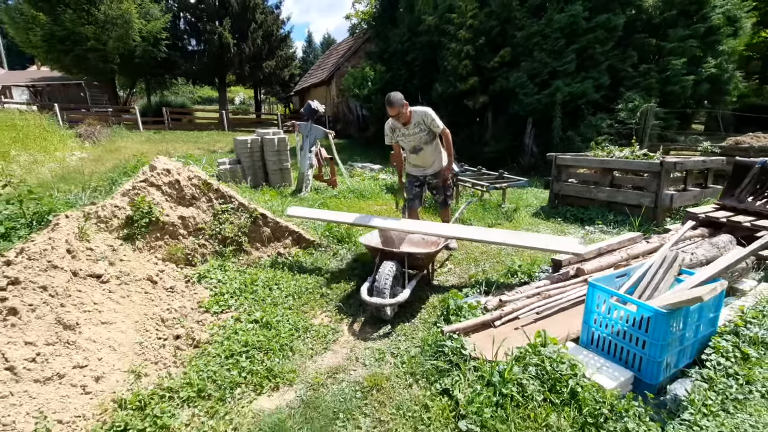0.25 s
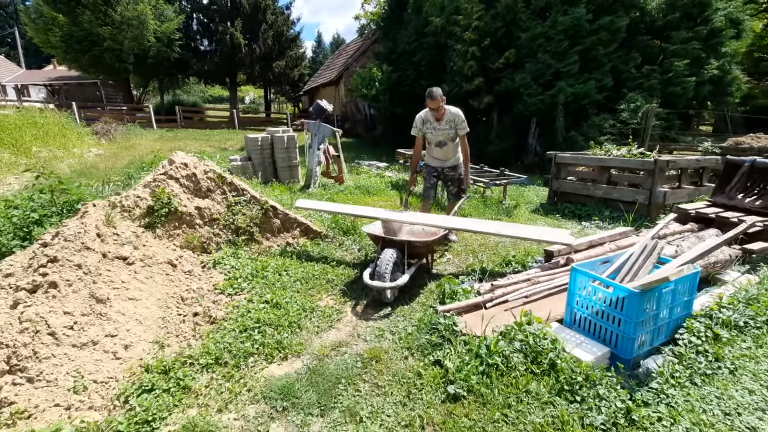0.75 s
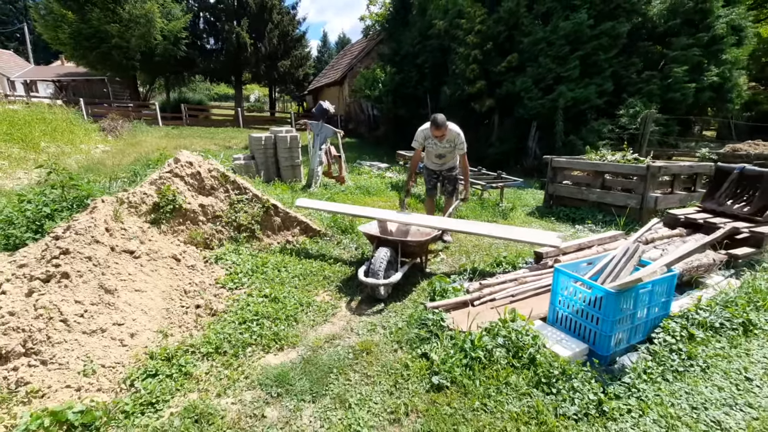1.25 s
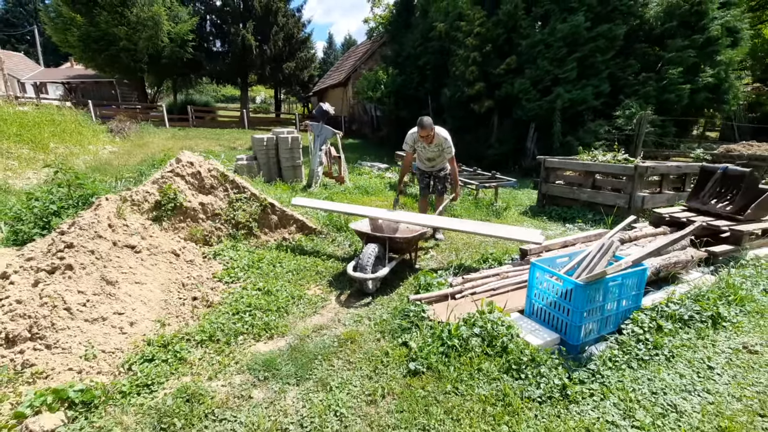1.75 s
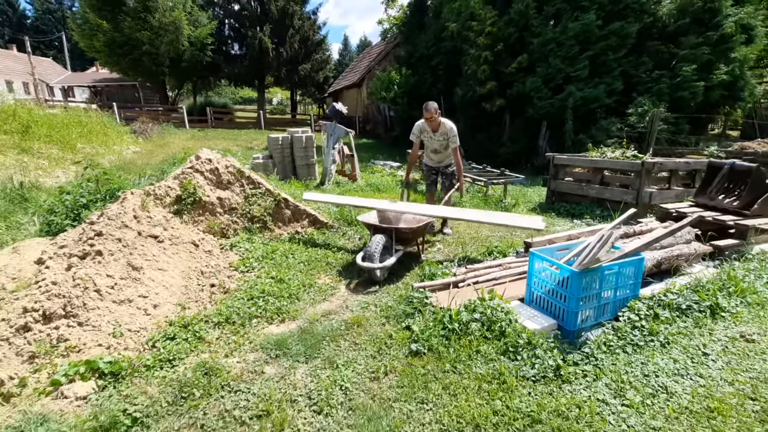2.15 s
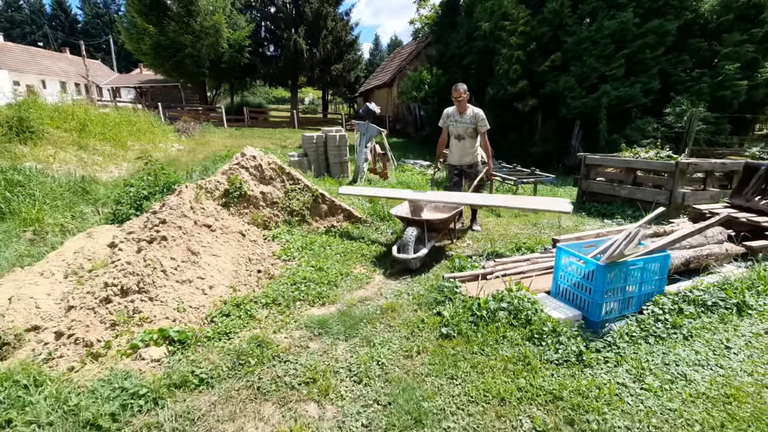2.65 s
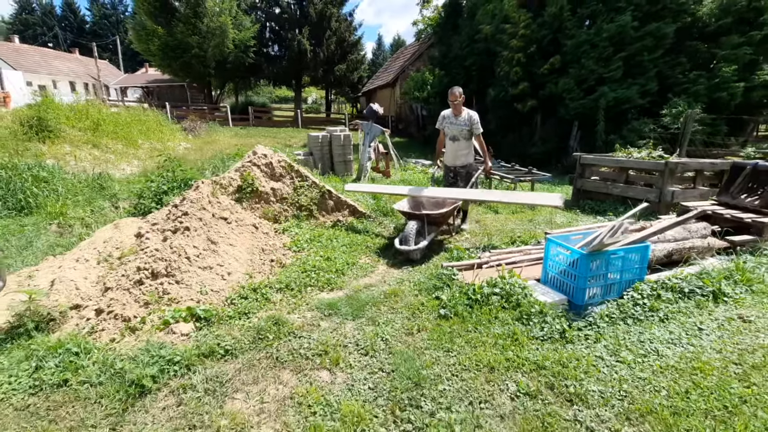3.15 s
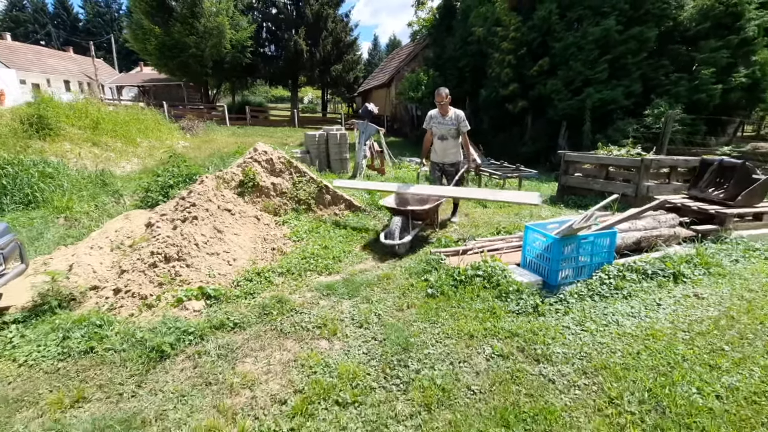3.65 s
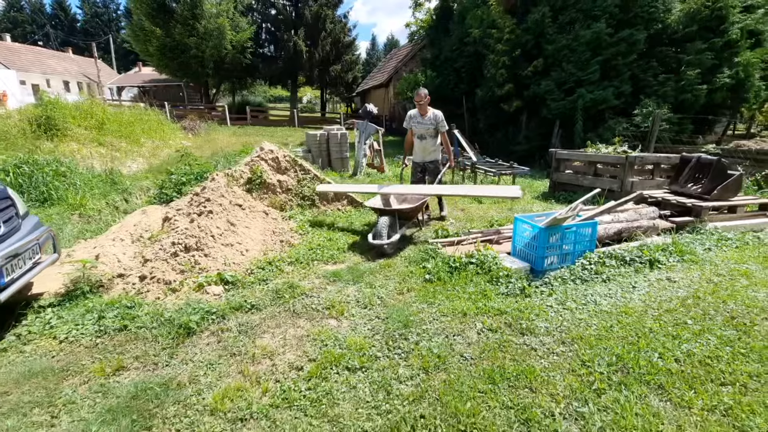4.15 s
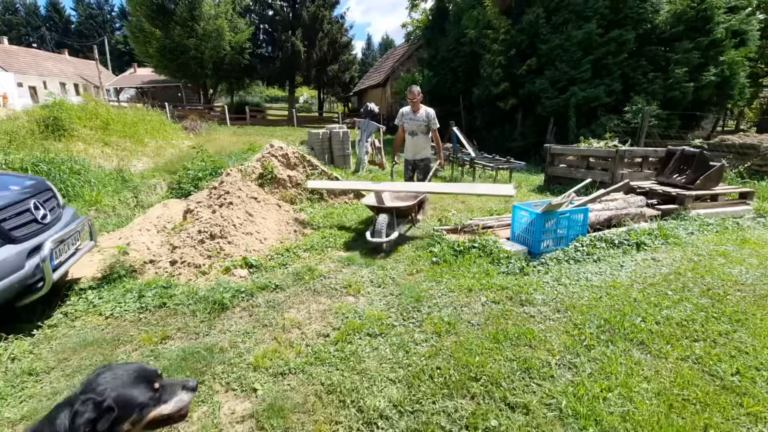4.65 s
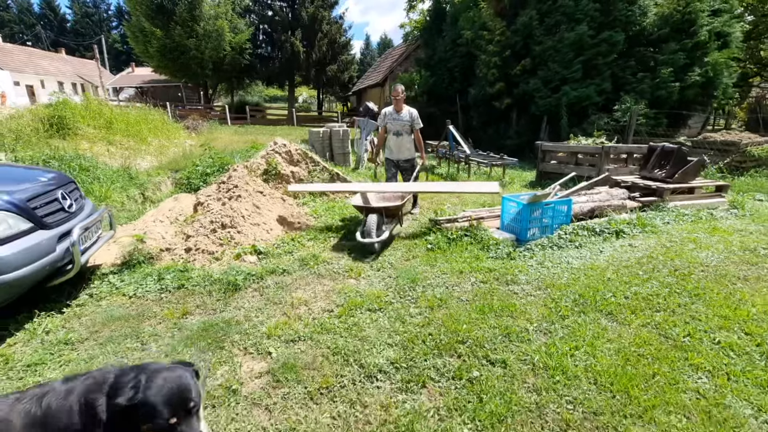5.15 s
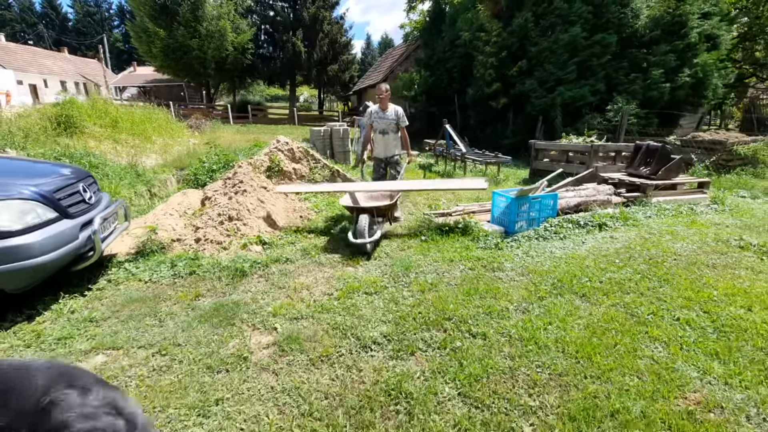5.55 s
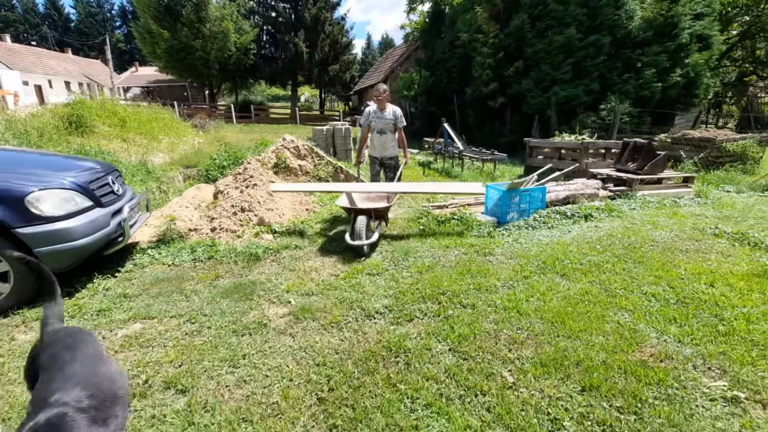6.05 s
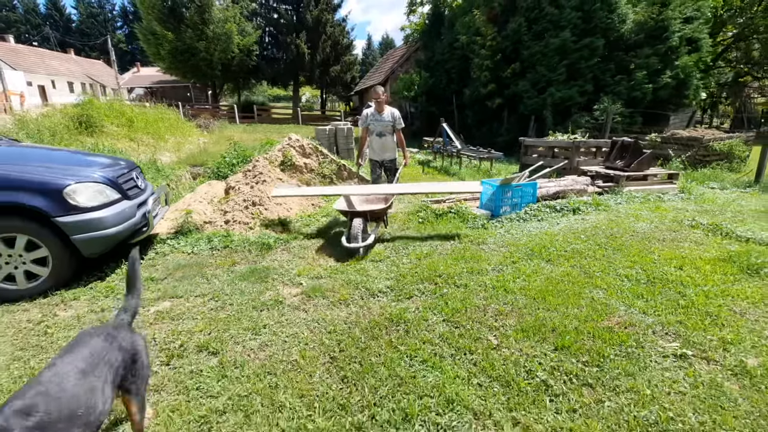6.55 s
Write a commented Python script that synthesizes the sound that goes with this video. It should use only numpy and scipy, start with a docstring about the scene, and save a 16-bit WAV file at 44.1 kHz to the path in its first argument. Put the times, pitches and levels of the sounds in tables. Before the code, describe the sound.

In an open grassy yard, irregular low wind puffs thump across a handheld stereo microphone over a faint leafy rustle. Far birds whistle with echoes from the trees, and sparrows chirp. Soft grass steps begin near one second; just before two, a plank knocks loudly on a metal wheelbarrow with a short hollow ring. Afterwards close footsteps swish more often, twigs tick, and the barrow murmurs very faintly.

```python
"""Wind buffets two microphone ports over a faint leafy rustle, and birds whistle and chirp among far trees.
Feet swish through grass, a plank knocks on a steel barrow that also rolls, twigs tick and hoarse calls wheeze.
Wind, leaves, grass and wheezes are coloured noise under level curves; whistles and chirps are gliding sines.
Knocks and rolling ring the same barrow modes; twigs are clicks with a brief resonance.
Far birds, chirps and knocks also come back as scattered echoes."""
import sys
import numpy as np
from scipy import signal
from scipy.fft import rfft, irfft, next_fast_len
from scipy.io import wavfile
from scipy.ndimage import uniform_filter1d

SR = 44100
rng = np.random.default_rng(int(sys.argv[2]) if len(sys.argv) > 2 else 0)


def to_wav(sig):
    """Store sig (one row per channel, or 1-D mono) as 16-bit WAV at the path in sys.argv[1].

    Samples outside -1..1 are clipped; the rate is SR.
    """
    pcm = np.clip(np.atleast_2d(sig), -1, 1) * 32767
    pcm = np.round(pcm).astype(np.int16)
    wavfile.write(sys.argv[1], SR, pcm.T)  # frames by channels


N = 300321   # length in samples

# ringing modes of the steel barrow, knocked or rolled: mode_hz [Hz], level_db [dB, relative], t60_s [s]
BARROW_MODES = [(173, -1.5, 0.3), (275, 5.5, 0.098), (294.5, -8, 0.28), (337, -10, 0.22), (630, -9.5, 0.19),
                (674, -4.5, 0.11), (742, -15, 0.24), (856, -14.5, 0.23), (1010, -14.5, 0.092),
                (1538, -5, 0.08), (2790, -2.5, 0.025)]


def amp(db):
    """Gain of a dB value."""
    return 10 ** (np.asarray(db) / 20)


def rms_one(x):
    """Scale to unit rms."""
    return x / np.sqrt(np.mean(x ** 2) + 1e-20)


def in_time(rows):
    """Columns of a curve table, one value a sample."""
    s, *columns = np.transpose(rows)
    return [np.interp(np.arange(N) / SR, s, c) for c in columns]


def swells(rows, steep):
    """Gains that swell and fade around each row's middle; the powers of the dB columns add up."""
    t, rows = np.arange(0, N + 64, 64) / SR, np.array(rows)
    middle_s, length_s = rows[:, :1], rows[:, 1:2]
    # the power is a quarter of its peak at half a length from the middle
    shape = np.exp(-np.log(4) * np.abs(2 * (t - middle_s) / length_s) ** steep)
    power = amp(2 * rows[:, 2:].T) @ shape
    return np.array([np.interp(np.arange(N) / SR, t, np.sqrt(p)) for p in power])


def split(level_db, pan_db):
    """Left and right dB that share a total level; pan is left minus right."""
    right_db = level_db - 10 * np.log10(1 + amp(2 * pan_db))
    return right_db + pan_db, right_db


def drift(rate, channels):
    """Slow chance: random knots of spread 1, rate per second, joined by straight lines."""
    knots = rng.standard_normal((channels, int(N / SR * rate) + 2))
    return np.array([np.interp(np.arange(N) / SR * rate, np.arange(len(k)), k) for k in knots])


def shaped(x, spectrum):
    """Colour by a (Hz, dB) table, falling 22.2 dB an octave beyond its ends; rms 1."""
    size = next_fast_len(N)
    hz, db = np.transpose(spectrum)
    f = np.maximum(np.arange(size // 2 + 1) * SR / size, 1)
    octaves_beyond = np.maximum(np.log2(hz[0] / f), 0) + np.maximum(np.log2(f / hz[-1]), 0)
    gain = amp(np.interp(np.log(f), np.log(hz), db) - 22.2 * octaves_beyond)
    return rms_one(irfft(rfft(x, size) * gain, size)[..., :N])


def ring(clicks, hz, t60):
    """A unit click sets a dying sine of starting height 1 ringing."""
    r, w = amp(-60 / (t60 * SR)), 2 * np.pi * hz / SR
    return signal.lfilter([0, np.sin(w)], [1, -2 * r * np.cos(w), r * r], clicks + 1e-18)


def echoes(x, t60):
    """Scattered echoes: a dying noise for each channel, in which leaves swallow the highs sooner."""
    t = np.arange(int(1.2 * SR)) / SR
    noise = rng.standard_normal((2, len(t)))
    dull = signal.lfilter(*signal.butter(2, 2400, fs=SR), noise)
    bright = noise - dull
    tail = dull * amp(-60 * t / t60) + bright * amp(-60 * t / (0.4 * t60))
    tail = tail / np.sqrt(t60 * SR / 14)
    return signal.fftconvolve(x[None], tail, axes=1)[:, :N]


def wind():
    """Turbulence of its own at each port; strong gusts reach higher in pitch."""
    # slow swell of the wind under the puffs: time_s [s], level_db [dB, both ports together, before drift and mix]
    slow_wind = [(0.0, -69), (1.0, -63), (2.2, -46), (2.6, -52), (3.7, -63), (4.7, -58), (6.72, -53.5),
                 (6.81, -30.5)]
    # puffs of wind: middle_s [s], level_db [dB, both ports together, before mix], pan_db [dB, left minus right]
    gust_puffs = [(0.297, -49.5, 32), (0.549, -53, 75), (0.79, -45.5, 31), (0.892, -39.5, 34),
                  (1.11, -39.5, -8.5), (1.191, -41, -9), (1.384, -43.5, -3), (1.553, -41, -5.5),
                  (1.896, -43.5, 18), (2.13, -47.5, 4), (2.333, -34.5, -16), (2.64, -50, 12),
                  (2.815, -42.5, -12), (3.154, -34, -31), (3.392, -42, -20), (3.632, -32, -28),
                  (3.845, -41.5, -2), (3.985, -38, -14.5), (4.385, -36.5, -9), (4.483, -41.5, -1.5),
                  (4.77, -50.5, 13), (4.944, -55, 5), (5.106, -46, -5), (5.253, -46, 5), (5.381, -41, -6),
                  (5.651, -43, -5.5), (5.868, -41.5, 1.5), (6.05, -41, -43), (6.225, -47, 19),
                  (6.368, -39, -19), (6.462, -37.5, -15), (6.561, -44, -17), (6.705, -47.5, 15)]
    # low turbulence: pitch_hz [Hz], density_db [dB per Hz]
    wind_colour = [(28, -13), (45, 0.5), (70, 5.5), (105, -3.5), (160, -36), (300, -23.5)]
    puff_s = 0.085
    s, level_db, pan_db = np.transpose(gust_puffs)
    puffs = swells(np.transpose([s, np.full(len(s), puff_s), *split(level_db, pan_db)]), steep=1.23)
    slow_db = np.array(split(*in_time(slow_wind), -2.5))
    gust = np.hypot(puffs, amp(slow_db + 0.43 * drift(4.5, channels=2)))
    eddies = shaped(rng.standard_normal((2, N)), wind_colour)
    # the gusts set the lumps, so the noise itself is evened
    lump = np.sqrt(uniform_filter1d(eddies ** 2, size=1024, axis=1))
    eddies = rms_one(eddies / (lump + 0.38))
    flutter = shaped(rng.standard_normal((2, N)), [(110, 21), (170, 10.0), (260, -9.5)])
    flutter_gain = amp(-14.0) * (gust / amp(-64.5)) ** 0.5   # more flutter in stronger gusts
    return gust * (amp(1.0) * eddies + flutter * flutter_gain)


def yard():
    """Leaves and far countryside: a steady rustle, partly alike in both ports below 1800 Hz, scattered above."""
    # colour of the leaves and countryside: pitch_hz [Hz], density_db [dB per Hz]
    yard_colour = [(180, -16), (300, 4.5), (550, 2), (3000, -12), (4100, -4.5), (6400, 0.5), (11000, -14),
                   (15000, -10)]
    shared, *own = shaped(rng.standard_normal((3, N)), yard_colour)
    low = signal.butter(1, 1800, fs=SR)
    both = signal.lfilter(*low, shared) + np.array(own) - signal.lfilter(*low, own) * 0.039
    return both * amp(-71.5 + 0.16 * drift(1.2, channels=1))


def notes(table, arch, fade_db, fuzz_hz, fuzz_rate):
    """Quick-onset fading sines of unsteady pitch, gliding from one value to the other or arching up and back."""
    out, unsteady = np.zeros(N + SR), drift(fuzz_rate, channels=1)[0]
    for s, length, a_hz, b_hz, level_db in table:
        u, at = np.linspace(0, 1, round(length * SR)), max(round(s * SR), 0)
        path = 1 - np.abs(2 * u - 1) ** 1.4 if arch else u
        pitch = a_hz + (b_hz - a_hz) * path + fuzz_hz * unsteady[at:at + len(u)]
        envelope = np.sin(np.pi * u) ** 0.3 * amp(-fade_db * u)
        tone = np.sin(2 * np.pi * np.cumsum(pitch) / SR)
        out[at:at + len(u)] += np.sqrt(2) * amp(level_db) * envelope * tone
    return out[:N]


def whistles():
    """Fluty whistles far off: gliding sines, with long, strong echoes from the trees."""
    # whistles: start_s [s], length_s [s], start_hz [Hz], end_hz [Hz], level_db [dB before fade, blur and pan]
    whistle_notes = [(0., 0.025, 690, 685, -66), (0., 0.09, 2240, 2300, -78), (.88, .3, 680, 670, -73),
                     (.41, 0.2, 1940, 1950, -76), (.62, 0.25, 1530, 1570, -78.5),
                     (.745, 0.25, 1750, 1790, -68), (.888, 0.085, 2005, 1990, -56.5),
                     (.992, 0.034, 1975, 1995, -54), (1.05, 0.16, 1390, 1385, -69.5),
                     (2.915, 0.03, 3250, 3650, -68), (2.955, 0.06, 3770, 3850, -64),
                     (3.03, 0.05, 3830, 3830, -69), (3.12, 0.14, 3210, 3210, -74),
                     (3.51, 0.045, 2800, 2770, -67), (3.82, 0.18, 3170, 3160, -68),
                     (3.95, 0.09, 3700, 3670, -73), (4., 0.16, 2760, 2730, -68),
                     (4.31, 0.06, 2920, 2920, -64.5), (4.76, 0.04, 3080, 3350, -69),
                     (4.94, 0.055, 2980, 3240, -71), (5.143, 0.12, 2975, 2960, -66),
                     (5.565, 0.064, 7880, 7830, -62.5)]
    blur = 1 + .45 * drift(120, channels=1)[0]   # moving air blurs far tones
    far = notes(whistle_notes, arch=False, fade_db=4, fuzz_hz=36, fuzz_rate=260) * blur
    return far * amp([[-4], [0]]) + amp(3) * echoes(far, t60=1.15)


def chirps():
    """Sparrow chirps: sines whose pitch arches, with flickering level and a short, quieter echo."""
    # chirps: start_s [s], length_s [s], edge_hz [Hz], top_hz [Hz], level_db [dB before fade, flicker and pan]
    chirp_notes = [(.04, 0.0415, 4140, 4630, -67), (.445, 0.058, 4100, 5200, -67),
                   (.56, 0.026, 4040, 4320, -74), (.645, 0.033, 3900, 4230, -73.5),
                   (.925, 0.058, 4300, 5420, -63.5), (1.035, 0.028, 4050, 4560, -64.5),
                   (2.231, 0.047, 4680, 5100, -58.5), (2.354, 0.014, 4360, 4930, -63),
                   (2.8, 0.044, 4730, 4730, -58.5), (2.803, 0.031, 5370, 5180, -57.5),
                   (3.965, 0.042, 4620, 5040, -60.5)]
    near = notes(chirp_notes, arch=True, fade_db=2.5, fuzz_hz=130, fuzz_rate=500)
    near = near * (1 + .6 * drift(200, channels=1)[0])
    return near * amp([[-3.5], [2.5]]) + amp(-6) * echoes(near, t60=.3)


def rolling():
    """The barrow's tray murmurs: small random bumps, softened by the tyre, ring its modes."""
    # rolling: time_s [s], level_db [dB]
    roll_level = [(0, -79.5), (2.4, -70.5), (2.6, -64.5), (3.0, -72.5), (3.9, -79), (4.5, -68.5),
                  (5.0, -92), (5.8, -67.5), (6.81, -92)]
    bumps_per_s, tyre_hz = 60, 445
    bumps = (rng.random(N) < bumps_per_s / SR) * rng.standard_normal(N)
    soft = signal.lfilter(*signal.butter(2, tyre_hz, fs=SR), bumps)
    level_db, = in_time(roll_level)
    murmur = sum(amp(db) * ring(soft, hz, t60) for hz, db, t60 in BARROW_MODES)
    return amp(level_db) * rms_one(murmur)


def grains(size_db):
    """White noise whose samples have uneven sizes, as many small blades snapping back."""
    sizes = np.minimum(rng.exponential(1, (3, N)), 6)
    return rms_one(rng.standard_normal((3, N)) * amp(size_db * sizes))


def close_pair(spectrum, alike):
    """Grainy noise, partly shared by the ports with a small lead on the left."""
    lead = 4   # samples
    shared, *own = shaped(grains(2.7), spectrum)
    alike = np.clip(alike, 0, 1)
    together = np.array([shared, np.roll(shared, lead)])
    return np.sqrt(alike) * together + np.sqrt(1 - alike) * np.array(own)


def swish():
    """Feet in grass: a body largely shared by both ports, dry rustle, and scattered hiss whose top leans left."""
    # steps: middle_s [s], length_s [s], level_db [dB before crunch and pan], hiss_db [dB above that level]
    swish_steps = [(0.978, 0.18, -63.5, -1), (1.494, 0.099, -60, -6.5), (2.045, 0.17, -62, 0),
                   (2.177, 0.62, -76.5, 12), (2.932, 0.14, -62, 2), (3.09, 0.03, -80.5, 18.5),
                   (3.15, 0.14, -76, 6.5), (3.471, 0.13, -67.5, 0), (3.715, 0.22, -57, -2),
                   (3.858, 0.23, -62.5, 5), (4.207, 0.032, -72, 6), (4.579, 0.12, -60.5, 2),
                   (4.697, 0.16, -62.5, 2.5), (5.093, 0.14, -64.5, 4.5), (5.342, 0.13, -56.5, 3.5),
                   (5.455, 0.15, -58.5, 3), (5.7, 0.085, -71, 6), (5.84, 0.16, -66.5, 8.5),
                   (6.163, 0.24, -57.5, 3), (6.26, 0.49, -81.5, 13.5), (6.57, 0.16, -61, 2.5),
                   (6.804, 0.18, -54.5, 0.5)]
    # drier rustles, strongest at 2-3 kHz: middle_s [s], length_s [s], level_db [dB before crunch and pan]
    dry_rustles = [(.33, 0.71, -76.5), (1.15, 0.2, -66), (1.62, 0.25, -65), (2.56, 0.072, -65),
                   (2.76, 0.6, -68), (4.22, 0.062, -60), (4.38, 0.33, -63), (5.22, 0.42, -65),
                   (5.84, 0.21, -65.5), (6.78, 0.27, -64.5)]
    # colours of body, rustle and hiss: pitch_hz [Hz], density_db [dB per Hz]
    body_colour = [(450, -12), (800, -2), (1100, 2.5), (1600, -1), (2200, -6)]
    rustle_colour = [(1300, -2), (2000, 4), (3000, 5.5), (3800, -2)]
    hiss_colour = [(3200, -3.5), (4500, -1), (7000, 1.5), (11000, -10.5), (15000, -1.5)]
    s, length, level_db, hiss_db = np.transpose(swish_steps)
    body, hiss = swells(np.transpose([s, length, level_db, level_db + hiss_db]), steep=1.76)
    dry_gain, = swells(dry_rustles, steep=2.06)
    # every swish holds some dry rustle, and every rustle some body and hiss
    rustle = np.hypot(dry_gain, body * amp(-5))
    body = np.hypot(body, dry_gain * amp(-8.5))
    hiss = np.hypot(hiss, dry_gain * amp(-2.5))
    # stalks give way unevenly
    crunch = amp(3.1 * drift(70, channels=2))
    low = crunch[0] * body * close_pair(body_colour, 0.62) * amp([[2.5], [.4]])
    low += crunch[1] * rustle * close_pair(rustle_colour, 0.78) * amp([[1.2], [2.5]])
    hiss = hiss * close_pair(hiss_colour, 0.16) * amp(3.27 * drift(40, channels=2))
    top = signal.sosfilt(signal.butter(4, 9200, "high", fs=SR, output="sos"), hiss)
    middle = signal.sosfilt(signal.butter(4, 9200, "low", fs=SR, output="sos"), hiss)
    return low + top * amp([[2.5], [-5.5]]) + middle * amp([[-1.5], [1.2]])


def wheezes():
    """Wheezy, hoarse calls: short puffs of narrow noise."""
    # calls: middle_s [s], length_s [s], level_db [dB], centre_hz [Hz]
    wheeze_calls = [(0.274, 0.071, -70.5, 6150), (.71, 0.07, -71, 6090), (1.15, 0.072, -71, 5900),
                    (1.294, 0.03, -68, 6100), (2.298, 0.13, -65, 6200), (3.295, 0.09, -70.5, 4360),
                    (3.368, 0.07, -67.5, 5730), (6.753, 0.094, -53, 2300)]
    width = 1.07   # band edge over centre
    out, noise = 0, rng.standard_normal((2, N))
    for s, length, level_db, hz in wheeze_calls:
        sos = signal.butter(2, [hz / width, hz * width], "band", fs=SR, output="sos")
        band = signal.sosfilt(sos, noise)
        out = out + swells([(s, length, level_db)], steep=7.3) * rms_one(band)
    return out


def ticks():
    """Twigs and stalks snapping: a click, and a resonance that dies within about ten cycles or 2 ms."""
    # snaps: start_s [s], peak_db [dB before pan], centre_hz [Hz]
    twig_snaps = [(1.525, -42, 2330), (2.345, -47, 4900), (2.416, -40.5, 12000), (3.207, -53, 1310),
                  (4.196, -48.5, 1430), (4.219, -39, 1480), (4.222, -60, 2840), (4.231, -47, 1700),
                  (4.252, -50, 1500), (5.219, -47, 1340), (5.690, -46, 9400)]
    out, click = np.zeros(N), np.eye(1, 1024)[0]
    for s, level_db, hz in twig_snaps:
        snap = ring(click, hz, max(10.6 / hz, .002)) + 0.5 * np.diff(click, prepend=0)
        at = round(s * SR)
        out[at:at + len(snap)] += snap / np.abs(snap).max() * amp(level_db)
    return out * amp([[2.2], [-2.2]])


def barrow():
    """Plank on the barrow: a click and a short rattle feed every mode; soft blows are low-passed; walls echo."""
    # knocks: start_s [s], level_db [dB, three times the early rms, before pan], hardness_hz [Hz],
    # lowest_hz [Hz, lowest moved; a glancing tick leaves the low modes still]
    plank_knocks = [(1.732, -39, 495, 25), (1.7811, -29, 8950, 800), (1.786, -23, 2460, 25),
                    (1.883, -45.5, 603, 25.2)]
    # countless plank modes, highs die first: top Hz, dB, t60 s
    thuds = [(1580, 3.5, 0.22), (3000, -4.5, 0.2), (8060, -2.4, 0.021)]
    out, t = np.zeros(N), np.arange(SR // 2) / SR
    for s, level_db, hard_hz, low_hz in plank_knocks:
        rattle = amp(-37.0) * rng.standard_normal((len(BARROW_MODES), len(t))) * amp(-60 * t / 0.28)
        # the plank settles softly
        rattle = signal.lfilter(*signal.butter(1, 700.0, fs=SR), rattle) * amp(5.5)
        rattle[:, 0] = -1   # the click
        body = sum(amp(db) * ring(hit, hz, t60) for hit, (hz, db, t60) in zip(rattle, BARROW_MODES))
        for thud_hz, thud_db, t60 in thuds:
            band = signal.butter(2, [thud_hz / 2.9, thud_hz], "band", fs=SR)
            noise = signal.lfilter(*band, rng.standard_normal(len(t)))
            body += noise * amp(thud_db - 60 * t / t60)
        body = signal.lfilter(*signal.butter(2, [low_hz, hard_hz], "band", fs=SR), body)
        body *= 1 - np.exp(-t * hard_hz / 2.0)   # a softer blow builds more slowly
        # the loose plank damps the ring unevenly
        body *= amp(5 * np.tanh(t / .03) * drift(60, channels=1)[0, :len(t)])
        at = round(s * SR)
        out[at:at + len(t)] += amp(level_db) * body / (3 * np.std(body[:1024]))
    return out * amp([[1.2], [-1.2]]) + amp(-16.0) * echoes(out, t60=0.58)


def scene():
    """All sources summed; birds and knocks bring their echoes from trees and walls."""
    birds = whistles() + chirps()
    return wind() + yard() + birds + rolling() + swish() + wheezes() + ticks() + barrow()


def record(dry):
    """The sound has a deep dip near 9 kHz; the deepest bass and the top are cut."""
    dry = signal.sosfilt(signal.butter(3, 38.0, "high", fs=SR, output="sos"), dry)
    dip = signal.sosfilt(signal.butter(2, [8300, 10100], "bandstop", fs=SR, output="sos"), dry)
    dip = dip + amp(-24) * dry   # a little still leaks through
    stop_hz = 15800 * 1.03   # 70 dB down from here up
    return signal.sosfilt(signal.cheby2(14, 70, stop_hz, fs=SR, output="sos"), dip)


dry = scene()
out = record(dry)
to_wav(out)
```